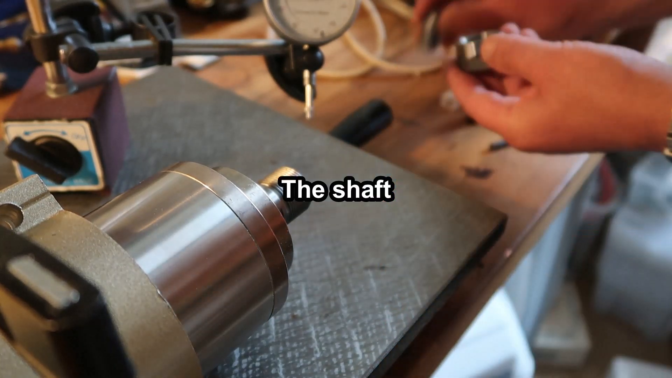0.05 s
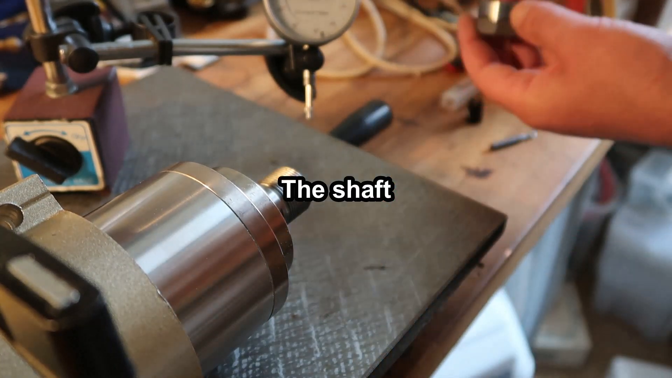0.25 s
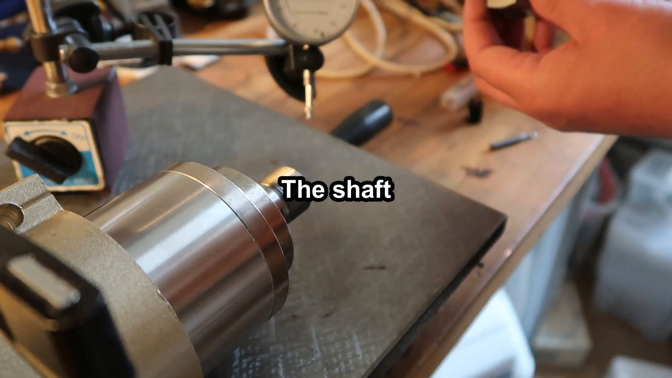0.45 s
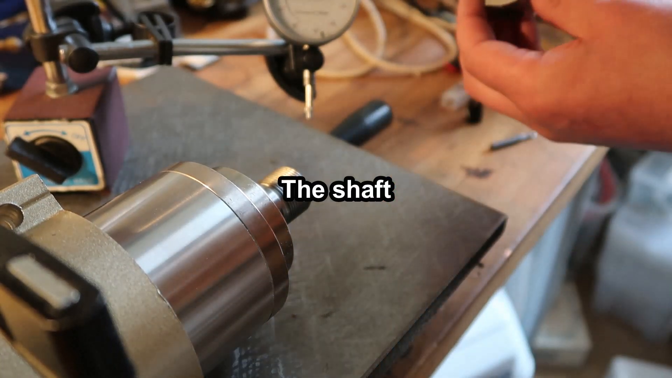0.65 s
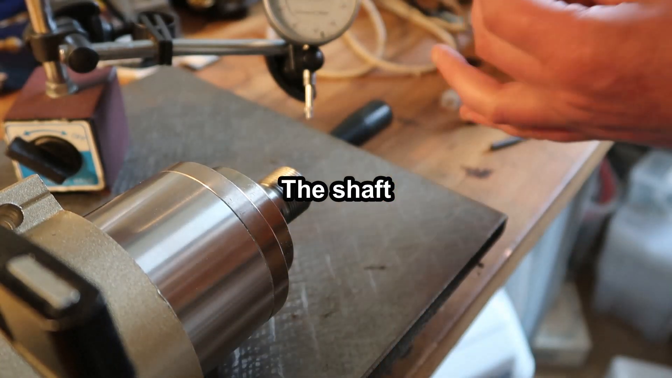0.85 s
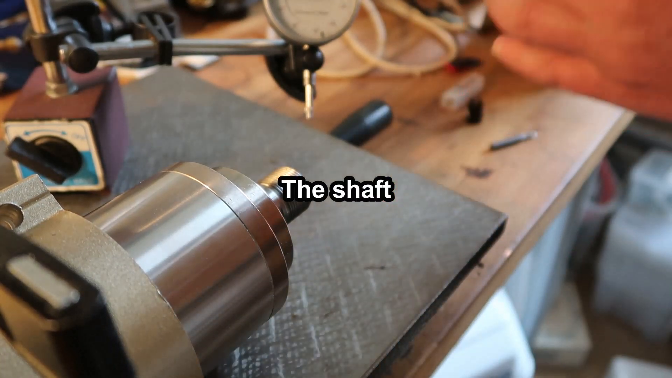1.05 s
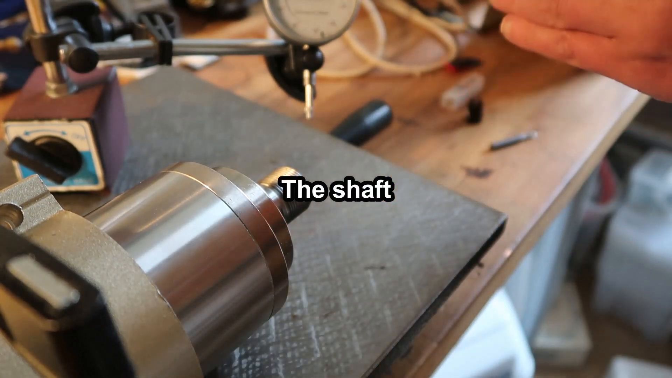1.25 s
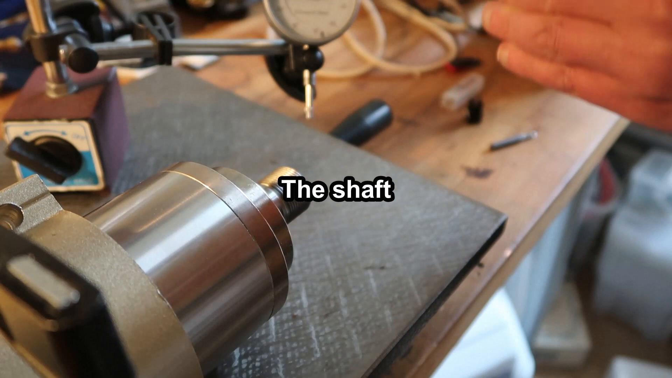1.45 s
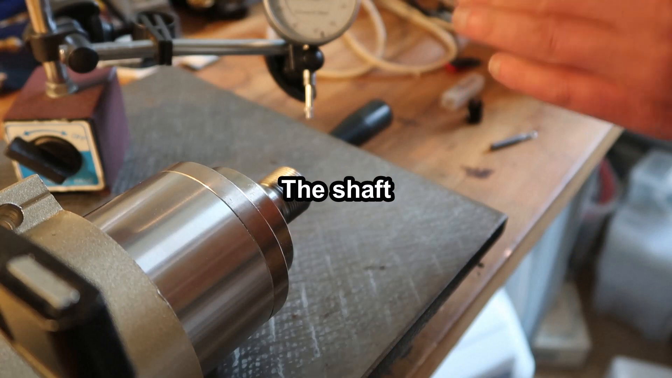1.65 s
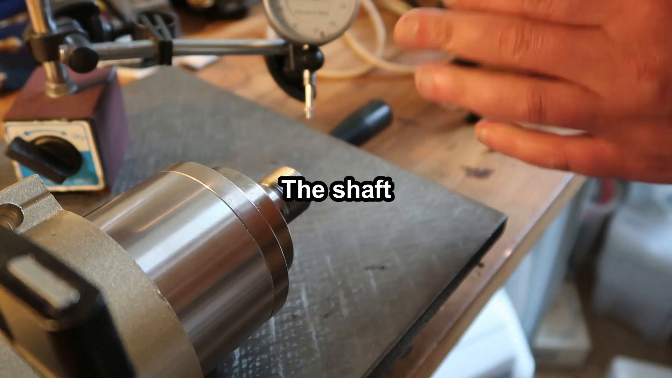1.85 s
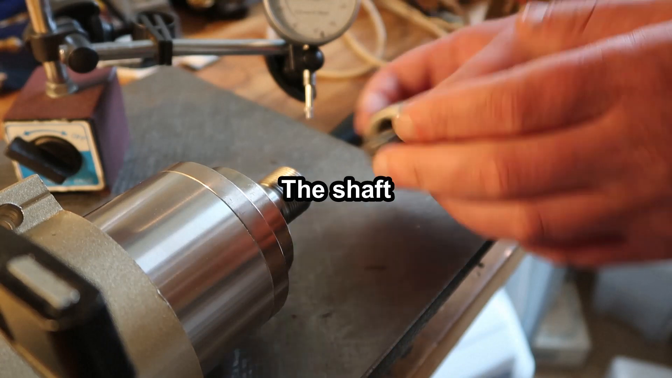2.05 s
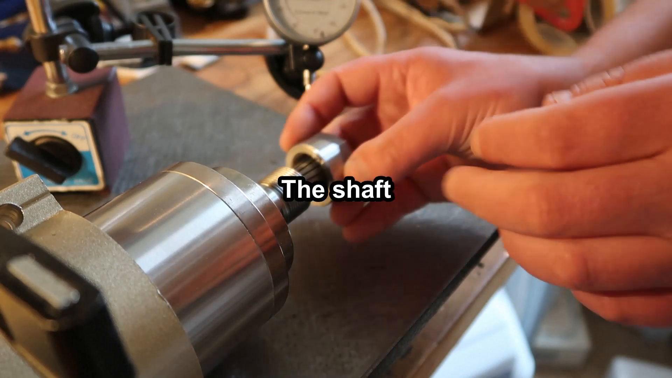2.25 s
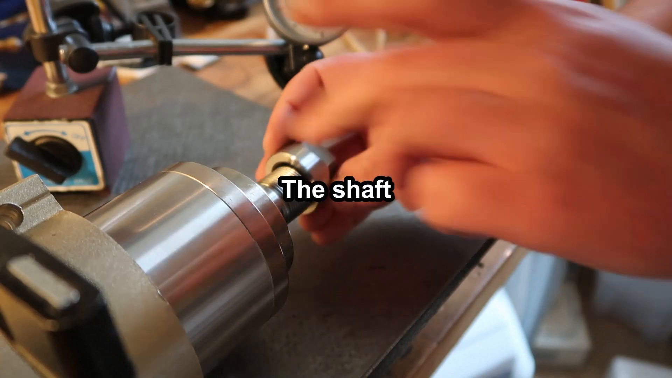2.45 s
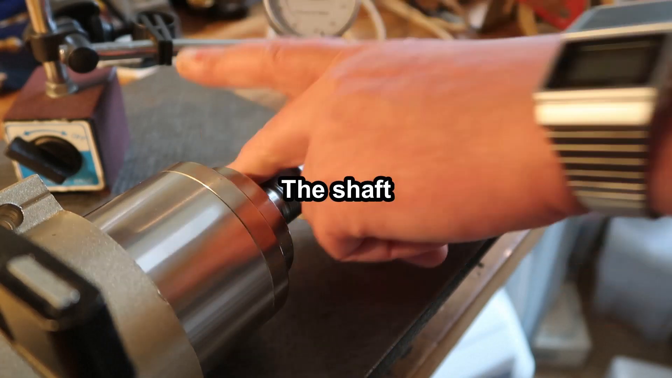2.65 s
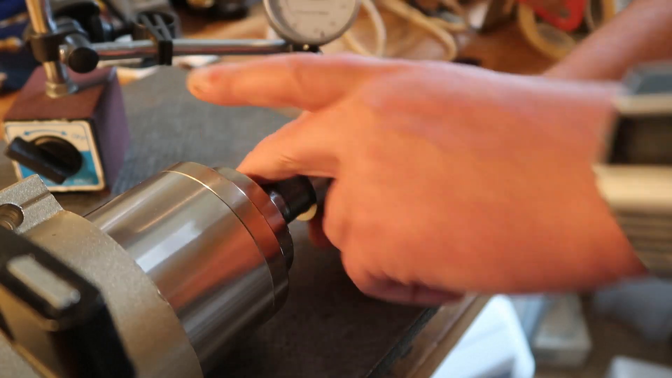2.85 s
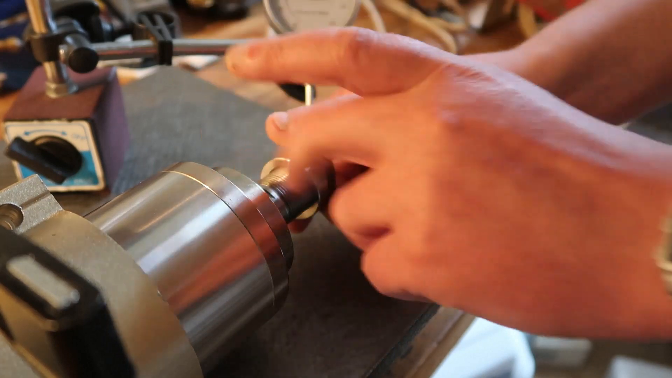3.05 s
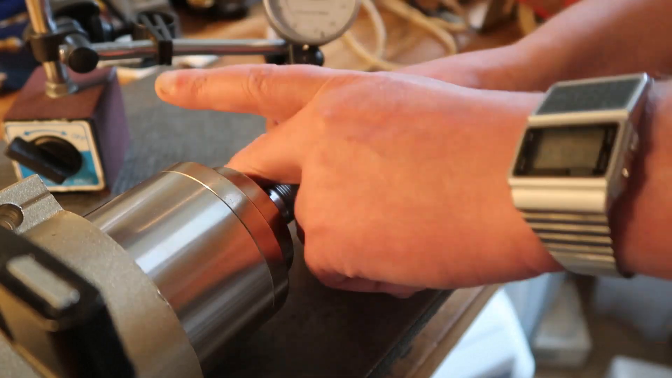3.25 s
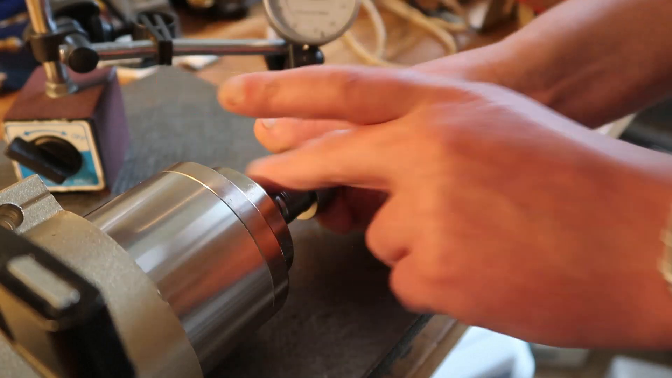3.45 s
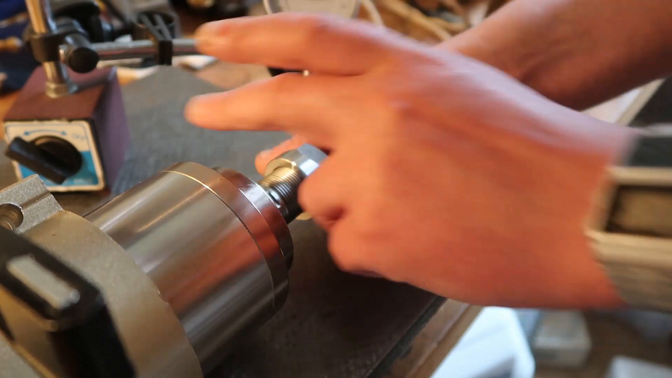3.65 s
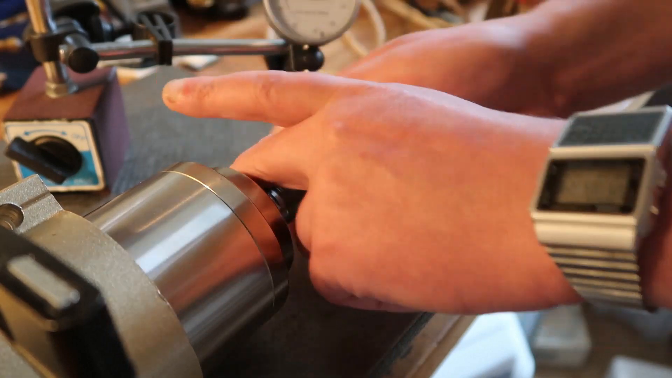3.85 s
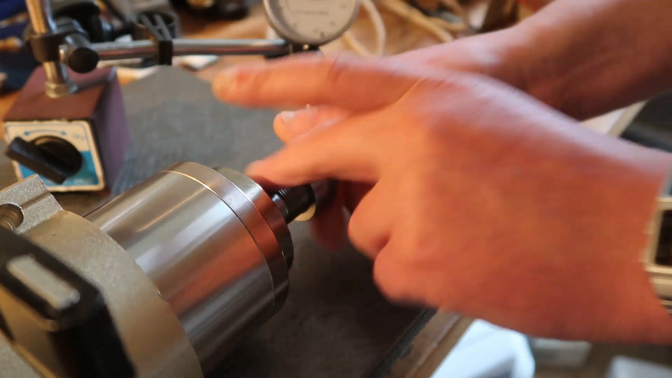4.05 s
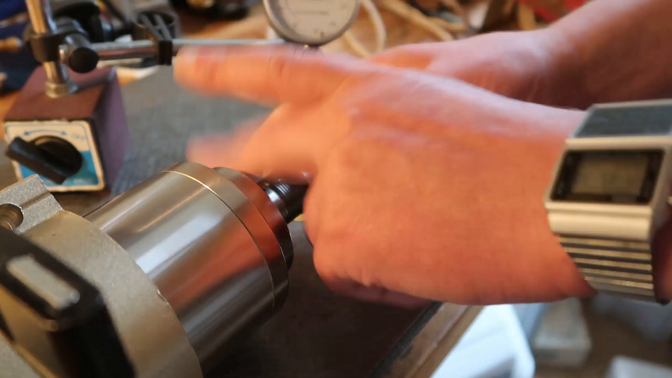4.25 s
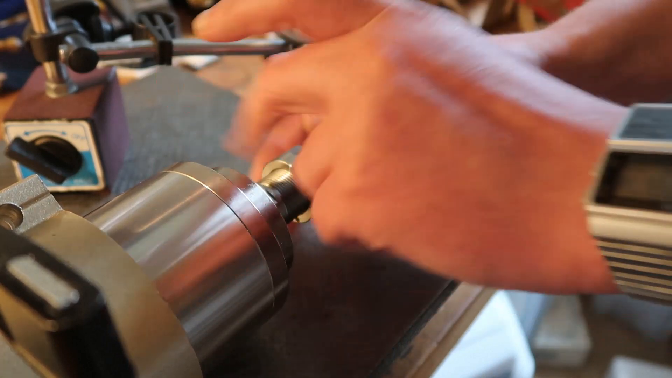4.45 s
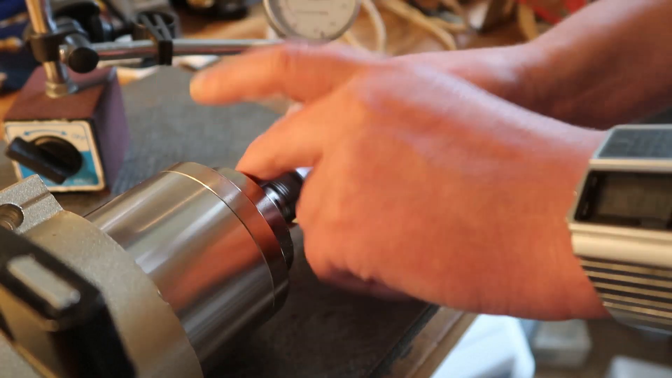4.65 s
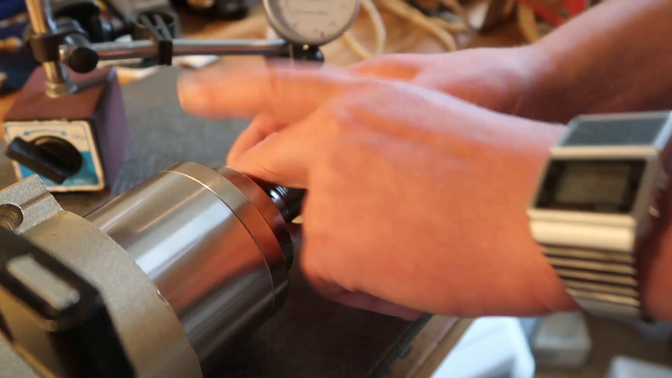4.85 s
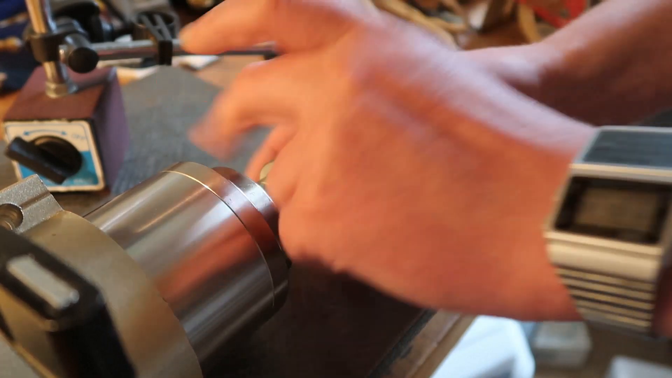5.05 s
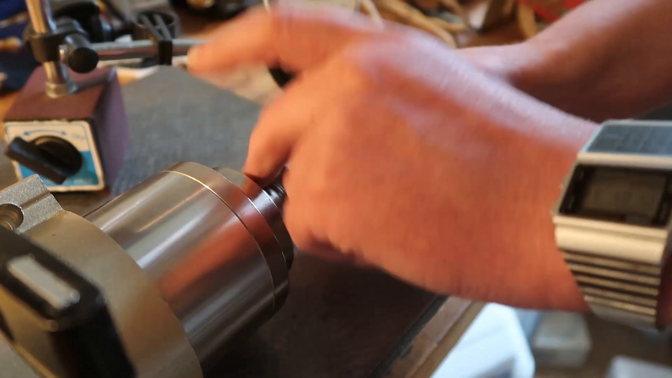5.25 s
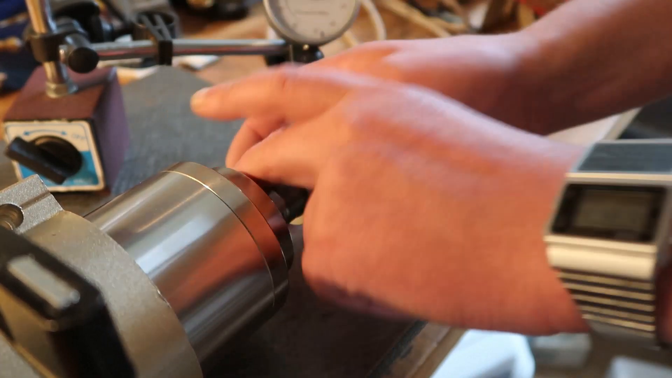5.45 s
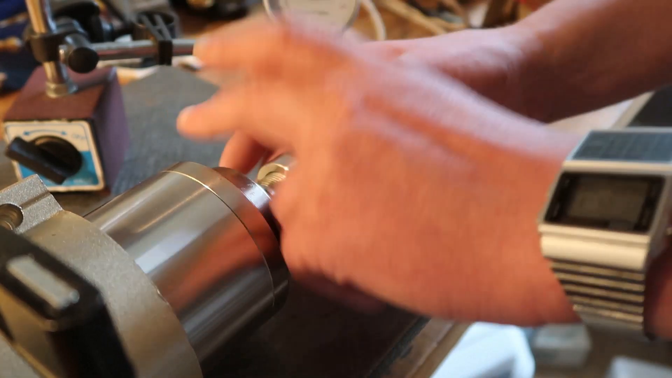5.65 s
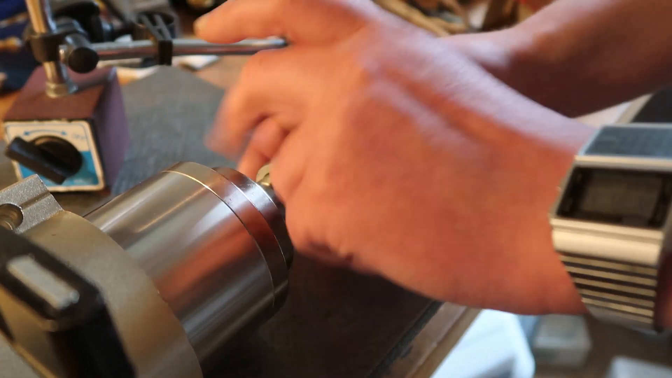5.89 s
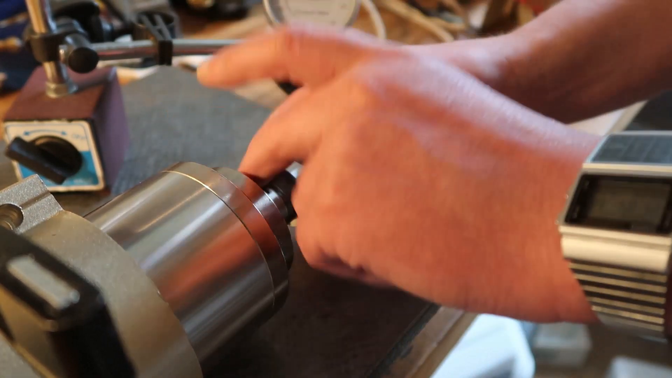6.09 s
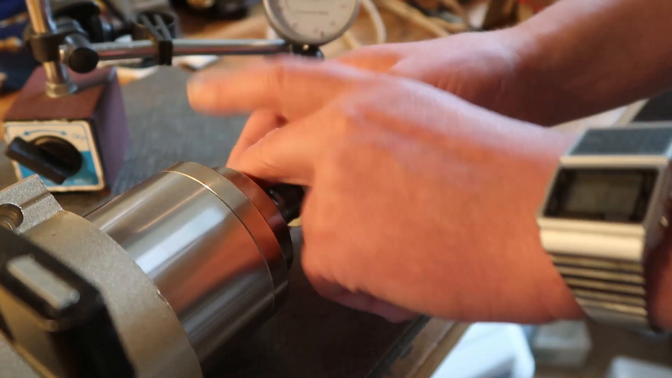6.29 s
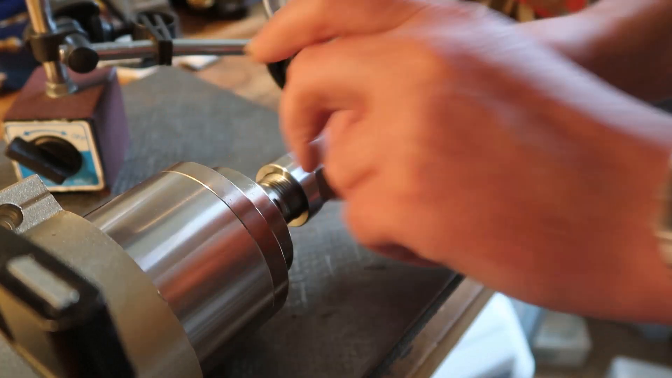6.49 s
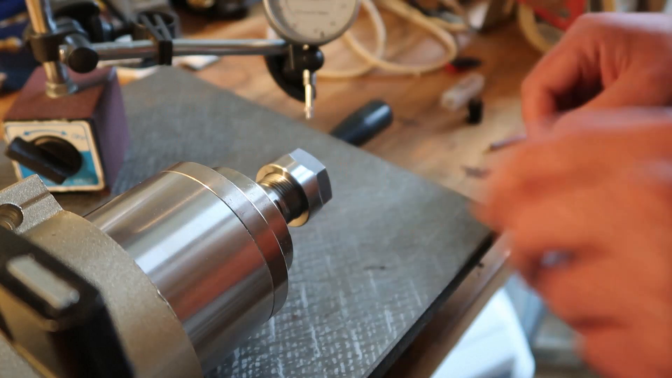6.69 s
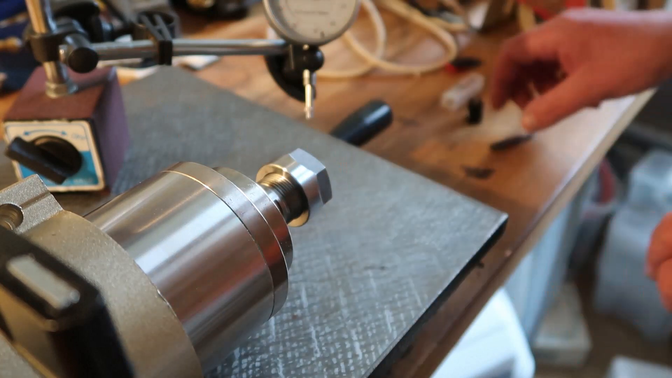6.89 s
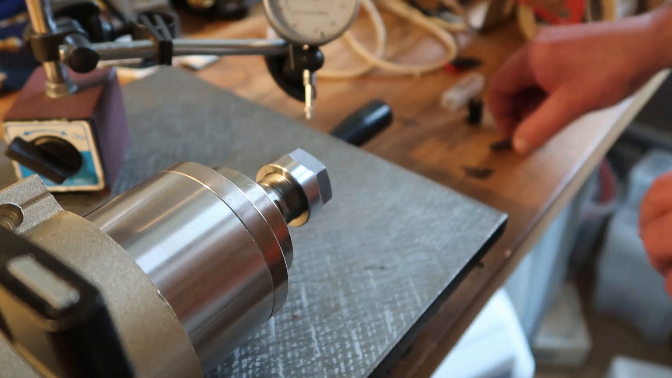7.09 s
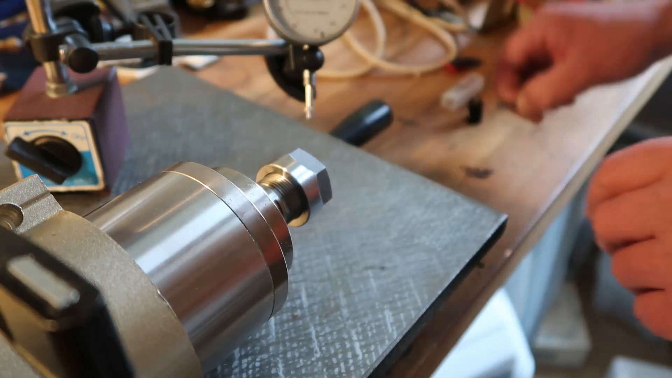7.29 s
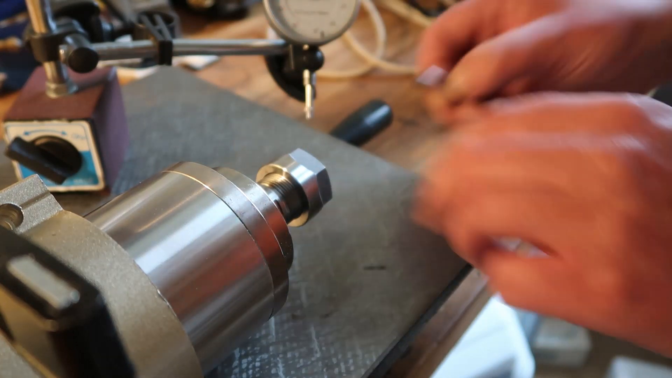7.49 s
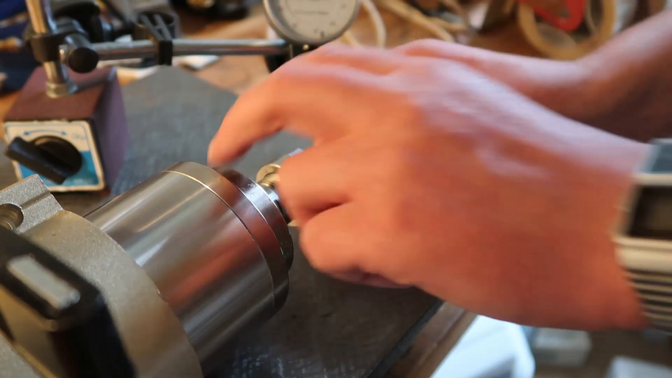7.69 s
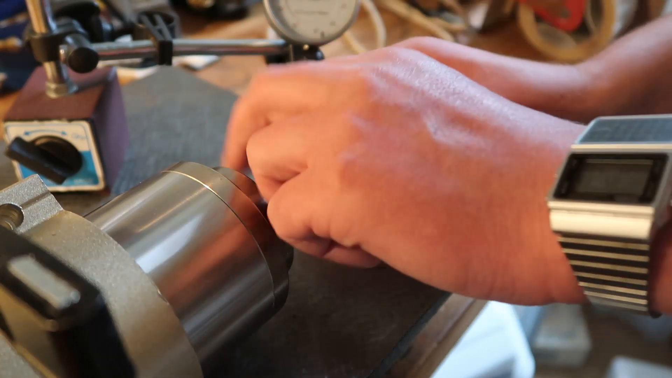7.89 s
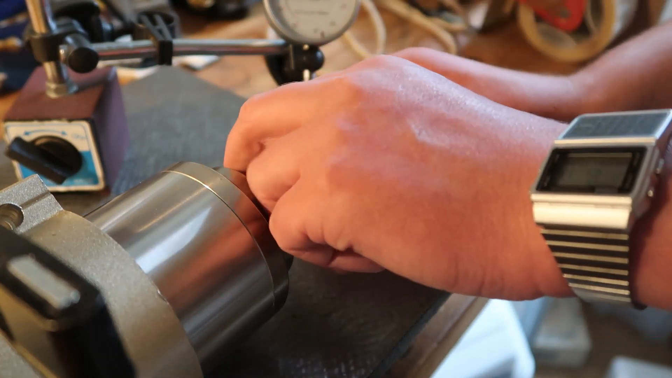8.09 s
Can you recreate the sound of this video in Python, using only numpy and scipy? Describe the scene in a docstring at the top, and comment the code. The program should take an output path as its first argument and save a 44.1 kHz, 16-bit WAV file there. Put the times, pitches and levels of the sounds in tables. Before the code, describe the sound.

Small steel parts are handled close to the microphone at a workbench. Sharp bright clicks come first, with one hard snap as a collet seats in its nut. The nut then meets the spindle with a cluster of ringing knocks and is spun on in short strokes, with scraping threads and soft finger thuds. After a pause, a part drags over wood and a pin clicks and chirps in. Quiet hiss continues underneath.

```python
"""A loose steel nut is spun by finger strokes onto a spindle nose: its threads knock and slide, ringing spindle and plate.
First a collet clicks into the nut, each tick a noise crack with a rattle, ringing steel modes; the free nut tinkles high.
Fingers thud softly and drag parts over the wooden bench; near the end a pin knocks and chirps as it slides into the collet.
All of it lies close to two microphone ports, in a workshop with a faint diffuse tail and steady coloured hiss."""
import sys
import numpy as np
from scipy import signal
from scipy.fft import rfft, irfft, next_fast_len
from scipy.io import wavfile

SR = 44100
rng = np.random.default_rng(int(sys.argv[2]) if len(sys.argv) > 2 else 0)


def waveform_to_disk(signal):
    """Save audio, clipped to [-1, 1], as 16-bit WAV at the path in sys.argv[1]."""
    frames = np.transpose(np.atleast_2d(signal))
    scaled = np.clip(frames, -1, 1) * 32767
    samples = np.round(scaled).astype(np.int16)
    wavfile.write(sys.argv[1], SR, samples)


N = 358533   # length in samples


def from_db(db):
    """Amplitude ratio of a level in dB."""
    return np.exp(np.asarray(db) * np.log(10) / 20)


def rms_one(x):
    """Scale to rms 1."""
    return x / np.sqrt(np.mean(x ** 2) + 1e-20)


def in_time(rows):
    """Columns over time, the first (a level in dB) at -140 outside the rows."""
    s, level, *rest = np.transpose(rows)
    t = np.arange(N) / SR
    return [np.interp(t, s, level, -140, -140)] + [np.interp(t, s, column) for column in rest]


def at_hz(points, hz):
    """Read a curve of (f, value) at hz, straight over log frequency."""
    point_hz, value = np.array(points)[:, 0], np.array(points)[:, 1]
    return np.interp(np.log(np.maximum(hz, 1)), np.log(np.maximum(point_hz, 1)), value)


def coloured(x, spectrum):
    """Unit-power minimum-phase colouring, so that nothing sounds before its cause."""
    gain = from_db(at_hz(spectrum, np.arange(1025) * SR / 2048))
    cepstrum = irfft(np.log(gain / np.sqrt(np.mean(gain ** 2))))
    # folding the cepstrum onto positive time makes the phase minimal
    cepstrum[1:1024] *= 2
    cepstrum[1025:] = 0
    response = irfft(np.exp(rfft(cepstrum)))
    return signal.fftconvolve(x, response)[:N]


def peak(x, hz, width_hz):
    """A resonance of gain 1 on top."""
    r = np.exp(-np.pi * width_hz / SR)
    poles = [1, -2 * r * np.cos(2 * np.pi * hz / SR), r * r]
    return signal.lfilter(np.array([1, 0, -1]) * (1 - r * r) / 2, poles, x)


def pan(x, db):
    """Left is louder than right by db."""
    return x * from_db([[db / 2], [-db / 2]])


def drift(rate):
    """Slow chance of spread 1, about rate changes a second."""
    count = round(rate * N / SR) + 2
    return np.interp(np.linspace(0, count - 1, N), np.arange(count), rng.standard_normal(count))


def clicks(s, db):
    """Single-sample blows at the given times and levels."""
    out = np.zeros(N)
    np.add.at(out, np.round(np.asarray(s) * SR).astype(int), from_db(db))
    return out


def ring(x, hz, t60):
    """A unit click sets a dying sine of about height 1 ringing."""
    r, w = from_db(-60 / (t60 * SR)), 2 * np.pi * hz / SR
    return signal.lfilter([0, np.sin(w)], [1, -2 * r * np.cos(w), r * r], x + 1e-18)


def struck(s, db, modes, spread_db):
    """Every blow strikes every mode, each with its own strength; neighbours start in opposite phase."""
    luck = rng.normal(0, 1, (len(s), len(modes)))
    out = np.zeros(N)
    for k, (hz, level_db, t60) in enumerate(modes):
        blows = clicks(s, db + level_db + spread_db * luck[:, k])
        out += (-1) ** k * ring(blows, hz, t60)
    return out


def grit(per_s, uneven_db):
    """Random small slips of uneven size and either sign; rms 1."""
    sizes = from_db(uneven_db * np.minimum(rng.exponential(1, N), 4)) * rng.choice([-1, 1], N)
    return rms_one(sizes * (rng.random(N) < per_s / SR))


def rubbed(slips, modes, wander_db):
    """Slips feed the modes, each more or less as the contact wanders; the steady answer has about their rms."""
    power = sum(from_db(2 * db) * t60 * SR / (4 * np.log(1000)) for hz, db, t60 in modes)
    out = np.zeros(N)
    for k, (hz, db, t60) in enumerate(modes):
        feed = slips * from_db(db + wander_db * drift(16))
        out += (-1) ** k * ring(feed, hz, t60)
    return out / np.sqrt(power)


def damped(modes, share):
    """The same modes with only this share of their ringing time."""
    return [(hz, db, t60 * share) for hz, db, t60 in modes]


# hiss and rumble of the quiet workshop: f/Hz, relative level/dB per Hz
ROOM_TONE = [(12, -38), (20, -6.5), (53, -4.5), (74, -2.5), (107, 0), (177, -5.5), (270, -5), (301, -6.5),
             (388, -6.5), (590, -12), (678, -13), (1090, -15.5), (1220, -14), (12400, -34.5), (16000, -59)]
# how wide the room sounds: f/Hz, side re mid level/dB
ROOM_WIDTH = [(60, -27), (130, -9), (290, -0.5), (640, 1), (1410, 0), (3100, 2), (6820, 0), (15000, -1.5)]
ROOM_MID_DB = -55.5   # rms


def room_tone():
    """Steady hiss and rumble; mid and side are unrelated noises."""
    hz = np.fft.rfftfreq(N, 1 / SR)
    mid, side = rfft(rng.standard_normal((2, N))) * from_db(at_hz(ROOM_TONE, hz))
    mid = irfft(mid, N)
    side = irfft(side * from_db(at_hz(ROOM_WIDTH, hz)), N)
    return from_db(ROOM_MID_DB) / np.std(mid) * np.array([mid + side, mid - side])


SHOP_T60_S, SHOP_DB = 0.46, -20


def workshop(x):
    """A diffuse dying tail, a different one on each side, starting after the first walls; weak in the bass."""
    t = np.arange(SR // 2) / SR
    tails = rng.standard_normal((2, len(t))) * from_db(-60 * t / SHOP_T60_S) * (t > .004)
    tails /= np.sqrt(np.sum(tails ** 2, axis=1, keepdims=True))
    tails = signal.sosfilt(signal.butter(2, 300, "high", fs=SR, output="sos"), tails)
    return from_db(SHOP_DB) * signal.fftconvolve(x, tails, axes=1)[:, :N]


# phase between the two microphone ports: f/Hz, lead of the left/rad
PORT_PHASE = [(300, 0), (2000, .3), (4000, .8), (7000, 1.5), (9500, 2.2), (16000, 2.1)]


def ports(x):
    """Close sound reaches the two microphone ports ever more out of step up through most of the treble."""
    size = next_fast_len(N)
    turn = np.exp(.5j * at_hz(PORT_PHASE, np.fft.rfftfreq(size, 1 / SR)))
    return irfft(rfft(x, size) * [turn, turn.conj()], size)[:, :N]


# fingers moving small parts on the wooden bench: t/s, level/dB
RUSTLE = [(0.0, -61), (0.334, -57), (0.4, -75), (0.5, -62)]
# a later drag over the same bench: t/s, level/dB before colouring
DRAG = [(7.08, -77), (7.116, -63), (7.146, -58.5), (7.192, -42.5), (7.215, -45), (7.235, -43),
        (7.26, -49.5), (7.32, -63), (7.36, -62)]
# colours of the wood under each: f/Hz, relative level/dB per Hz
RUSTLE_COLOUR = [(180, -40), (300, 7.5), (410, 12.5), (586, -2), (638, -13), (725, -1), (3140, 2),
                 (9000, -14.5), (11700, -58), (19800, -120)]
DRAG_COLOUR = [(71, -64), (120, -40), (217, 3), (288, -3.5), (376, 9), (478, -21.5), (795, -2.5),
               (866, -19), (942, -1.5), (1270, -19.5), (3500, -26.5), (4550, -72), (7700, -120)]


def bench():
    """Skin and small parts sliding on wood: dense grit in the colour of the surface."""
    rustle = coloured(grit(per_s=4400, uneven_db=-3.0), RUSTLE_COLOUR) * from_db(in_time(RUSTLE)[0])
    drag = grit(per_s=1500, uneven_db=-4.0) * from_db(in_time(DRAG)[0])
    return rustle + coloured(drag, DRAG_COLOUR)


# a finger lands on the nut and the bench gives: t/s, level/dB before padding, f/Hz
PUSHES = [(3.33, -50, 121), (4.087, -46, 99), (4.379, -27, 100), (4.413, -34, 150), (4.667, -30, 106),
          (4.727, -33, 111), (4.964, -28.5, 99), (5.015, -41, 123), (5.25, -30.5, 109), (5.529, -29.5, 102),
          (5.811, -27, 119), (6.095, -28.5, 107), (6.401, -31, 105)]


def fingers():
    """Soft low thuds: a padded contact of some ms, and the bench gives for a cycle or two."""
    thuds = sum(ring(clicks([s], db), hz, t60=.06) for s, db, hz in PUSHES)
    pad = np.hanning(round(.005 * SR))
    return signal.fftconvolve(thuds, pad / pad.sum())[:N]


# a steel pin pushed into the collet: t/s, level/dB, f/Hz
PIN = [(7.91, -67, 2010), (7.917, -38.5, 1940), (7.95, -48, 1800), (7.97, -55, 1900), (8.024, -69, 1800),
       (8.03, -38.5, 1746), (8.04, -35, 1592), (8.05, -37, 1590), (8.056, -47, 1570), (8.07, -44, 1560),
       (8.09, -54, 1590), (8.12, -76, 1530)]


def pin():
    """A rough narrow squeak: a gliding tone whose strength flutters at random."""
    level_db, hz = in_time(PIN)
    return from_db(level_db) * drift(350) * np.sin(2 * np.pi * np.cumsum(hz) / SR)


# steel clicking on steel, collet in nut and nut on spindle: t/s, crack level/dB, centre f/Hz,
# then re crack: rattle level/dB, nut ring level/dB, collet ring level/dB
TICKS = [(.5891, -13.5, 6300, -7.5, -17.5, -29.5), (0.623, -32, 8700, 9, -14, -31),
         (0.6542, -11, 8600, -9, -15, -38), (.6582, -19, 8000, -7, -12, -29),
         (0.6655, -14, 8300, -7, -12, -35), (0.6714, -12.5, 8400, -7.5, -19.5, -28),
         (.7084, -34, 8160, 3, -22, -27), (0.811, -38, 7950, -10, -28, -27),
         (.825, -36.5, 7600, -1, -29, -29), (0.943, -38, 7350, -1, -22, -25),
         (1.0784, -27.5, 8040, 2, -11, -31), (1.259, -45.5, 6760, 3.5, -31, -15),
         (1.3154, -24, 7640, 5.5, -28, -42), (1.3232, -3, 10100, -8, -29, -28.5),
         (1.3356, -25, 8340, 9.5, -30, -34), (1.514, -19.5, 5250, -8, -19, -20.5),
         (1.609, -48, 7760, 13.5, -24, -23), (1.6302, -35, 5200, -4.5, -30, -9.5),
         (1.755, -41, 7800, -1.5, -14, -24), (2.062, -49, 7950, 0, -16, -28),
         (2.09, -40, 7800, -3, -13, -27), (2.1167, -44, 7760, 1.5, -12, -26),
         (2.388, -26, 6060, -27, -12, -30), (2.396, -29, 8100, 1, 1.5, -32),
         (2.454, -29.5, 8300, -2, -14, -34), (2.5795, -24.5, 4470, -16, -39, -17),
         (2.6017, -9.5, 4370, -9.5, -45, -13.5), (2.789, -34, 6630, -5, -16, -26),
         (3.4542, -24, 4460, -34, -44, -18), (4.086, -39, 4700, -5, -17, -23),
         (4.403, -45, 2980, -18, -40, -33), (4.658, -41, 8250, -2, -17, -32),
         (5.243, -36, 7300, -16, -31, -38), (5.808, -44, 8100, -2, -18, -32),
         (7.838, -25, 4800, -17, -20, -21), (7.913, -47.5, 3770, 5.5, -30, -36)]
ON_SPINDLE_S = 2.3   # ticks from here on happen at the spindle
EDGE = 5   # sharp first edge of a crack, re its noise
RATTLE_S, RATTLE_TAIL_S, RATTLE_TAIL_DB = .008, .032, -7   # the rattle drops quickly, then lingers
RATTLE_LUMP_DB = 1   # it comes in uneven lumps
# the harder the tick, the smaller the share of its broad part: dB re crack at a crack of -30 dB, slope
BROAD_DB, SHARE_PER_DB = -19.5, -0.0378
RATTLE_BROAD_DB = -0.5   # the rattle has less of the broad part than the crack


def cracks():
    """Noise of each tick, a crack of a few ms and a rattle about its own centre; also the rattle that shakes the collet."""
    s, crack_db, centre_hz, rattle_db, _, collet_db = np.transpose(TICKS)
    share_db = SHARE_PER_DB * (crack_db + 30)
    t = np.arange(SR // 4) / SR
    out, shaking = np.zeros(N + SR), np.zeros(N + SR)
    lumps = np.resize(from_db(RATTLE_LUMP_DB * drift(300)), N + SR)
    dying = np.exp(-t / RATTLE_S) + from_db(RATTLE_TAIL_DB) * np.exp(-t / RATTLE_TAIL_S)
    for k, noise in enumerate(rng.standard_normal((len(s), len(t)))):
        start = round(s[k] * SR)
        span = slice(start, start + len(t))
        crack = (noise + EDGE * (t == 0)) * np.exp(-t / .0011)
        rattle = noise * lumps[span] * from_db(rattle_db[k]) * dying
        centred = peak(crack + rattle, centre_hz[k], 2.4 * centre_hz[k])
        centred = peak(centred, centre_hz[k], 0.35 * centre_hz[k])
        broad = crack + from_db(RATTLE_BROAD_DB) * rattle
        out[span] += from_db(crack_db[k]) * (centred + from_db(BROAD_DB + share_db[k]) * broad)
        if s[k] < ON_SPINDLE_S:
            shaking[span] += from_db(crack_db[k] + collet_db[k] + 13.5) * rattle
    return out[:N], shaking[:N]


# modes of the struck steel, t60 when undamped: f/Hz, relative level/dB, t60/s
NUT = [(5955, -14, .1), (7130, -18, .08), (7700, -11, .08), (7905, -5, .14), (7970, -6, .14),
       (8035, -4, .15), (8300, -9, .05), (8900, -10, .05), (9800, -8, .09), (11990, -10, .07),
       (12200, -9, .09), (14050, -11, .06), (14215, -8, .08), (15410, -3, .07)]
COLLET = [(1940, -5.5, 0.026), (2204, -4, 0.026), (2590, -2.5, 0.031), (3440, -19, 0.021),
          (3920, -10, 0.085), (4100, -1, 0.019)]   # held in the fingers
SEATED = [(4160, -10, 0.04), (4300, -11, .03), (4800, 3.5, 0.019), (5260, -8, 0.032), (4960, -10.5, 0.048)]   # collet in the nut, on the spindle
FLANGE = [(1253, -5, 0.051), (1294, -7.5, 0.083), (1377, 0, 0.04), (1430.4, 1.5, 0.036), (1429, -3, 0.084),
          (1530, -8, 0.091), (1612, -7, 0.076), (1798, -12.5, 0.054)]
SHAFT = [(1953, -6, .07), (2090, -4, .07), (2230, -8, .08), (2450, -6, .03), (2810, -5, .06),
         (2950, -5, .07), (3035, -5, .12), (3150, -6, .06), (3290, -5, .05)]
# spans in which the nut lies loose and rings freely: from t/s, to t/s
LOOSE = [(.5, 1.0), (2.3, 2.5)]
GRIP_DAMPING = .2   # share of the nut's ringing time left while it is gripped or seated
SEATED_DB = 5   # the seated collet rings this much more
FLANGE_BLOW_DB, SHAFT_BLOW_DB = -15, -21.5   # ticks on the spindle strike these too, re crack


def tick_rings():
    """Each tick strikes the nut and the collet; on the spindle it also strikes flange and shaft."""
    s, crack_db, _, _, ring_db, collet_db = np.transpose(TICKS)
    nut_db, collet_db = crack_db + ring_db, crack_db + collet_db
    loose = np.any([(a < s) & (s < b) for a, b in LOOSE], axis=0)
    out = struck(s[loose], nut_db[loose], NUT, spread_db=3.0)
    out += struck(s[~loose], nut_db[~loose], damped(NUT, GRIP_DAMPING), spread_db=4.0)
    on = s > ON_SPINDLE_S
    out += struck(s[~on], collet_db[~on], COLLET, spread_db=4.0)
    out += struck(s[on], collet_db[on] + SEATED_DB, SEATED, spread_db=3.0)
    out += struck(s[on], crack_db[on] + FLANGE_BLOW_DB, FLANGE, spread_db=2.5)
    out += struck(s[on], crack_db[on] + SHAFT_BLOW_DB, SHAFT, spread_db=3.0)
    return out


# bare click of steel: f/Hz, relative level/dB per Hz
CRACK = [(200, -15), (1500, 3), (2300, 0.5), (3300, 8.5), (5000, -6), (8000, -5.5), (10500, -6.5),
         (13000, -10), (16000, 4.5)]
RATTLE_RING_DB = -14.5   # the rattle also rings the collet, re its shaking
SNAP_S, SNAP_DB, SNAP_WIDTH_S = 1.3236, -23, 0.00076   # one short dull push on the air


def collet():
    """Cracks, rattle and ringing of the ticks, and the push on the air as the collet snaps home."""
    noise, shaking = cracks()
    rings = tick_rings() + from_db(RATTLE_RING_DB) * rubbed(shaking, COLLET, wander_db=-1.0)
    push = np.hanning(round(SNAP_WIDTH_S * SR))
    thump = signal.fftconvolve(clicks([SNAP_S], SNAP_DB), push)[:N]
    return coloured(noise, CRACK) + rings + thump


# grit between the sliding surfaces: f/Hz, relative level/dB per Hz
SCRAPE = [(1180, -23), (2000, 2.5), (2460, 1), (3030, 4.5), (3610, -5), (5010, -0.5), (5540, -2),
          (6500, -4), (8140, -14), (9000, -51), (11700, -75), (19800, -120)]
BRIGHT_HZ = 4000   # grit above this is the bright rasp


def scrape(slips, low, bright, count):
    """Slips are dealt to short waxing and waning resonances; dull grit and bright rasp have their own gains."""
    dealt = rng.integers(0, count, N)
    grains = np.zeros(N)
    for k, hz in enumerate(np.geomspace(1900, 8000, count)):
        share = slips * (dealt == k) * from_db(3.5 * drift(12))
        grains += ring(share, hz, 60.0 / hz)
    grains = rms_one(coloured(grains, SCRAPE))
    dull = signal.sosfilt(signal.butter(3, BRIGHT_HZ, "low", fs=SR, output="sos"), grains)
    rasp = signal.sosfilt(signal.butter(3, BRIGHT_HZ, "high", fs=SR, output="sos"), grains)
    return low * dull + bright * rasp


# slides of the nut along the thread; from 7.8 s, of the pin into the collet; before the rubbing trims:
# full-speed t/s, run-up t/s, held t/s, coasting loss/dB per s, flange level/dB, then re flange:
# rocking level/dB, housing level/dB, shaft level/dB, grit level/dB, rasp level/dB, nut level/dB
SLIDES = [(2.387, 0.0012, 0.011, 234, -22, -6.5, -8, -18.5, -25, -24, -16.5),
          (2.58, 0.0089, 0.018, 225, -27, -22, -2.5, -14, -12.5, -9.5, -24),
          (2.603, 0.002, 0.008, 225, -27.5, -7.5, -4.5, -20, -14, -9.5, -45),
          (2.722, 0.006, 0.034, 260, -31.5, -8, -1, -18, -17, -23, -57),
          (2.778, 0.035, 0.0054, 300, -40, 6, -2, -3.5, -5.5, -18, -28),
          (2.797, .015, 0.0089, 225, -37.5, -6, -6, -22, -22, -14, -33),
          (2.845, .02, 0.026, 225, -46, -1, -5, -13, -21, -30, -39),
          (2.905, 0.036, 0.019, 225, -44, 7, 6, -19, -17, -27, -44),
          (2.955, 0.023, 0.018, 225, -38.5, -18, -16, -27, -18, -22, -42),
          (3.012, 0.037, 0.038, 225, -40, 0, -3.5, -20, -16, -12.5, -40),
          (3.081, 0.019, 0.025, 222, -42.5, 4, -4.5, -20, -11.5, -13, -40),
          (3.328, 0.064, .003, 227, -29, 2, -4, -23.5, -20, -27, -53),
          (3.45, 0.014, 0.0024, 225, -29.5, -8, -3, -11.5, -14, -16, -50),
          (3.531, 0.026, 0.071, 225, -45.5, 3, -4, -11, -9.5, -11, -38),
          (3.734, 0.11, .023, 225, -55.5, 16.5, 6, -14, -20, -12, -30),
          (4.025, 0.017, 0.0081, 225, -52.5, 3, 6.5, -16, -18, -18, -33),
          (4.055, 0.014, 0.0091, 225, -47.5, 2, -2.5, -4, -17, -17, -35),
          (4.085, .012, 0.0092, 225, -32, -4, -13.5, -12.5, -16, -17, -30),
          (4.139, 0.023, 0.014, 223, -47, 14, -7, -13, -10, -10, -26),
          (4.29, 0.068, 0.0089, 225, -65, 15, 3, -7, -1, 5, -14),
          (4.405, .002, 0.015, 295, -26.5, -1, -4, -24, -37, -30, -39),
          (4.655, 0.039, 0.034, 223, -41.5, 11, 1, -11, -23, -20.5, -22),
          (4.724, 0.059, 0.0054, 224, -34.5, 3, -8.5, -12.5, -21, -18.5, -25.5),
          (4.945, 0.021, 0.014, 209, -30, 3, -0.5, -15, -17, -17, -32.5),
          (5.271, 0.011, 0.014, 300, -38.5, 12, 3.5, -12.5, -26, -25, -34),
          (5.32, .015, .01, 225, -41.5, 0, -4, -9, -21, -14, -26),
          (5.352, 0.06, 0.011, 282, -36, -5, -3.5, -8, -17, -8, -26),
          (5.405, .015, 0.0044, 225, -53, 1, -12, -12, -24, -26, -34),
          (5.512, 0.011, 0.0094, 225, -42.5, 9.5, -15, -13, -14, -15, -36),
          (5.584, 0.026, 0.018, 202, -41.5, -2, -5.5, -11, -22, -24, -36),
          (5.782, .005, .011, 225, -51.5, 15, 5.5, -18, -24, -22, -28),
          (5.862, 0.036, 0.03, 228, -43, 6.5, -8, -9, -21, -23, -38),
          (5.903, 0.059, 0.0039, 227, -46.5, -2, -2, -29, -20, -20, -38),
          (6.137, 0.065, 0.0062, 231, -40, -5, -4.5, -21, -21.5, -19, -34),
          (6.44, 0.12, 0.025, 225, -69.5, 24, 7, -16, -2, 0, -15),
          (7.839, .004, 0.0079, 260, -37.5, -3, 2, -15, -12, -10, -27),
          (7.916, .004, 0.024, 260, -45, 0, -15, -22, -19, -28, -32),
          (7.996, 0.01, 0.016, 260, -43, -7, -3.5, -24, -17, -32, -40),
          (8.04, .02, 0.02, 260, -44.5, -4, -15, -25, -40, -40, -46)]
RUN_UP_DB = 24.5   # gained over the run-up
CATCH_DB, CATCHES_PER_S = 1.5, 140   # the contact grips and lets go while it slides


def slides():
    """Each slide runs up, holds and coasts away; gains for flange, rocking, housing, shaft, grit, rasp and nut."""
    s, run_up, held, coast, db, *parts = np.transpose(SLIDES)
    t = np.arange(0, N / SR, .001)
    late = t - s[:, None]
    rise_db = RUN_UP_DB * np.minimum(late, 0) / run_up[:, None]
    fall_db = coast[:, None] * np.maximum(late - held[:, None], 0)
    gains = from_db(db + np.array([0 * db, *parts])) @ from_db(rise_db - fall_db)
    # the second term offsets the power that the random catching would add
    catch = from_db(CATCH_DB * drift(CATCHES_PER_S) - CATCH_DB ** 2 * np.log(10) / 20)
    return [catch * np.interp(np.arange(N) / SR, t, gain) for gain in gains]


# thread flanks knocking on the spindle nose; from 7.1 s, knocks of the part picked up and pushed in:
# t/s when the rocking has swelled, rocking level/dB before a trim of -3 dB,
# hardness = ring of the stiffer parts re untrimmed rocking level/dB
KNOCKS = [(2.397, -16.5, 11.5), (2.438, -20, -13), (2.465, -22.5, 1), (2.549, -33, 0), (2.585, -30, 12),
          (2.618, -16, 6.5), (2.665, -32, -6), (2.687, -22.5, -24), (2.724, -31.5, 8.5), (2.749, -30, 12),
          (2.796, -17.5, -4), (2.844, -31, -1), (2.902, -26.5, -1), (2.953, -29.5, -5), (3.035, -15, -10),
          (3.083, -21, -0.5), (3.251, -38.5, -27), (3.301, -27.5, -8), (3.309, -23.5, 0), (3.332, -14, 2),
          (3.368, -26.5, -4), (3.451, -24.5, -4), (3.521, -30.5, -11), (3.618, -29, -16), (3.735, -36.5, 5),
          (3.764, -35, -17), (3.803, -43.5, 7), (3.873, -36.5, -6), (3.92, -42.5, -19), (4.02, -42.5, 6),
          (4.086, -29, 10), (4.108, -22.5, -25), (4.153, -26, -28), (4.37, -25, -18), (4.41, -13.5, -3.5),
          (4.437, -22.5, -8), (4.536, -39, -2), (4.643, -22, -10), (4.688, -20, -22), (4.724, -16, -26),
          (4.767, -30, -8), (4.836, -35, -2), (4.89, -39, -8), (4.943, -23, -1), (4.967, -20.5, -11),
          (5.034, -27, -2), (5.229, -30.5, -6), (5.275, -19, -8), (5.324, -27.5, -3), (5.366, -22, -10),
          (5.436, -40, -12), (5.515, -23, -12), (5.561, -36, -14), (5.637, -29.5, -3), (5.782, -30, -14),
          (5.812, -35, -26), (5.886, -21, -12), (6.095, -32.5, -26), (6.122, -36, 4), (6.407, -32.5, -22),
          (6.449, -48, -20), (7.119, -45, -22), (7.186, -30.5, -28), (7.232, -41, 5.5), (7.842, -34.5, 11),
          (7.922, -44.5, 10), (7.994, -41, 1), (8.056, -39, -11)]
# modes of spindle on plate (two close ones that beat), housing and bench: f/Hz, relative level/dB, t60/s
ROCKING = [(382, -2, .11), (410, 0, .12)]
HOUSING = [(545.4, -5, 0.068), (623.7, -11, 0.18), (683, -3.5, 0.031), (816, -3, 0.044), (886, -2.5, 0.039),
           (956, 0, 0.067), (1065, -4.5, 0.024)]
BENCH = [(111, -1, 0.17), (194.3, 6.5, 0.13), (307.7, -2.5, 0.37)]
SWELL_S = 0.0068   # a knock lands this long before the rocking has swelled
HOUSING_KNOCK_DB, FLANGE_KNOCK_DB, SHAFT_KNOCK_DB = -19.5, -13, -32   # added to the hardness
SLIDE_DAMPING, SHAFT_DAMPING = .35, .6   # share of ringing time left in nut and shaft while rubbed
SEATED_RUB_DB = -13   # the rasp also rings the seated collet, re rasp


def thread():
    """Knocks and slides of the nut, at the end of the pin, ringing the spindle, the bench and the nut itself."""
    s, rocking_db, hard_db = np.transpose(KNOCKS)
    s = s - SWELL_S
    stiff_db = rocking_db + hard_db
    rocking = struck(s, rocking_db - 3.0, ROCKING, spread_db=1.5)
    out = struck(s, stiff_db + HOUSING_KNOCK_DB, HOUSING, spread_db=2.5)
    out += struck(s, stiff_db + FLANGE_KNOCK_DB, FLANGE, spread_db=2.5)
    out += struck(s, stiff_db + SHAFT_KNOCK_DB, SHAFT, spread_db=2.5)

    # the same slips rub all the ringing parts; the scrape has grit of its own
    flange, rock, housing, shaft, gritty, rasp, nut = slides()
    slips = grit(per_s=6000, uneven_db=2.5)
    rocking += from_db(-7) * rubbed(slips * rock, ROCKING, wander_db=1.5)
    out += from_db(-16.5) * rubbed(slips * rock, BENCH, wander_db=4.0)
    for gain, modes in [(flange, FLANGE), (housing, HOUSING), (shaft, damped(SHAFT, SHAFT_DAMPING))]:
        out += from_db(-3) * rubbed(slips * gain, modes, wander_db=3.0)
    out += rubbed(slips * nut, damped(NUT, SLIDE_DAMPING), wander_db=6.0)
    out += from_db(SEATED_RUB_DB) * rubbed(slips * rasp, SEATED, wander_db=4.0)
    out += scrape(grit(per_s=4000, uneven_db=3.0), gritty, rasp, count=11)
    return out + peak(rocking, hz=376, width_hz=330)   # the plate radiates chiefly this range


SPINDLE_PAN_DB = 1.5   # the spindle lies a little to the left


def scene():
    """Close work at the bench, its tail in the workshop, and the room tone."""
    near = collet() + pan(thread() + pin(), SPINDLE_PAN_DB) + fingers() + bench()
    # the close sound has little below 55 Hz
    near = signal.sosfilt(signal.butter(2, 55, "high", fs=SR, output="sos"), near)
    return ports(near) + workshop(near) + room_tone()


CUTOFF_HZ = 16300


def record(dry):
    """The top is cut steeply."""
    return signal.sosfilt(signal.cheby2(12, 70, CUTOFF_HZ, fs=SR, output="sos"), dry)


dry = scene()
out = record(dry)
waveform_to_disk(out)
```